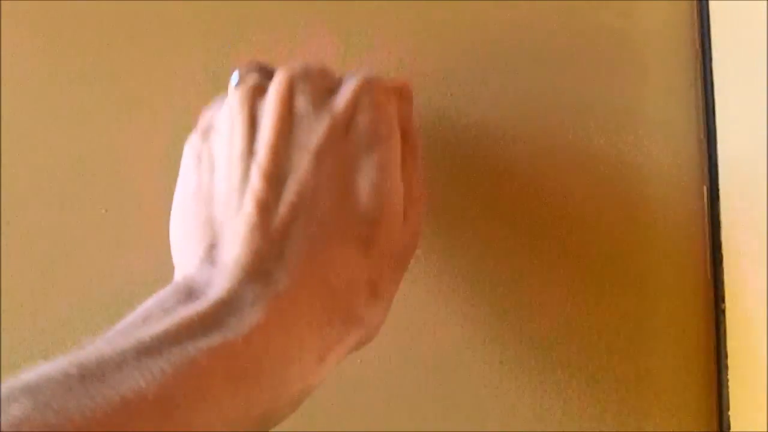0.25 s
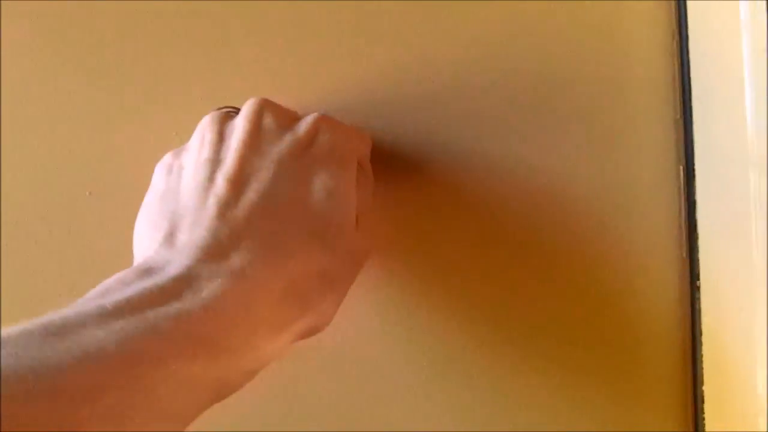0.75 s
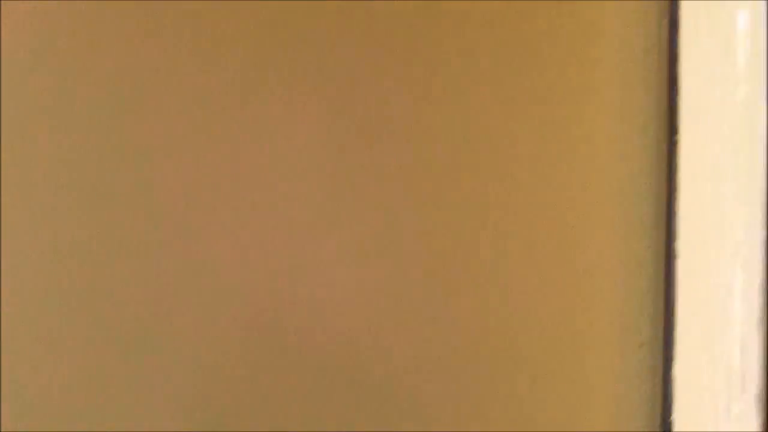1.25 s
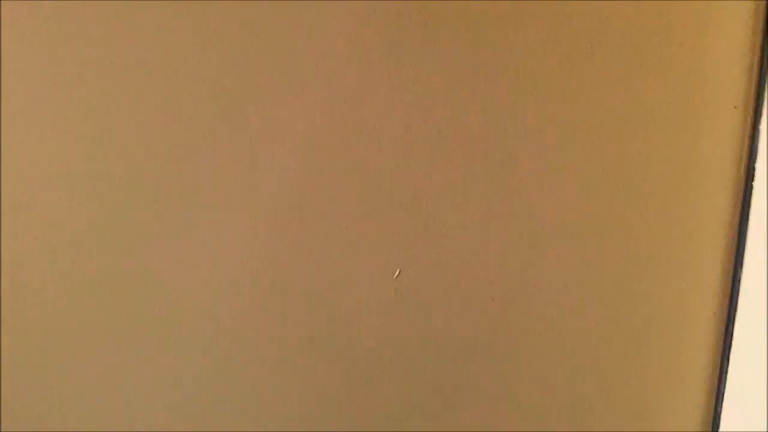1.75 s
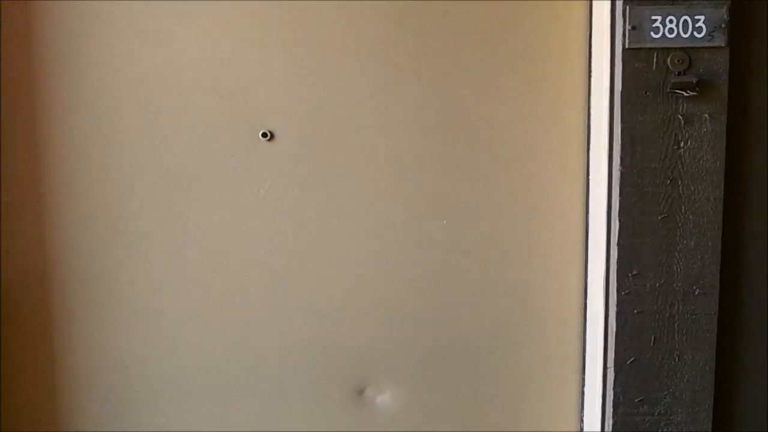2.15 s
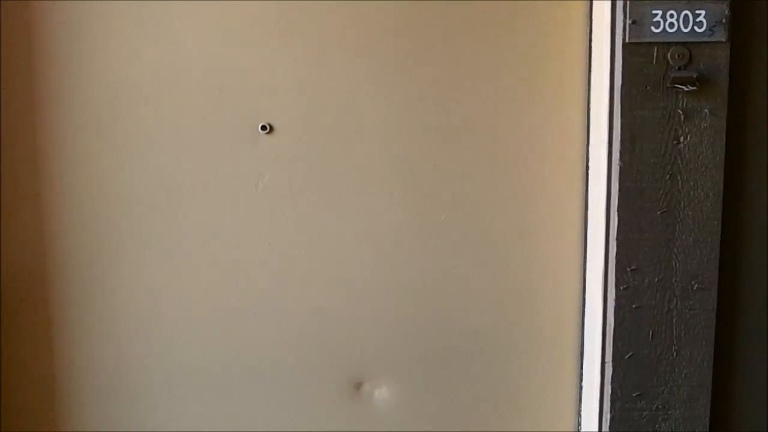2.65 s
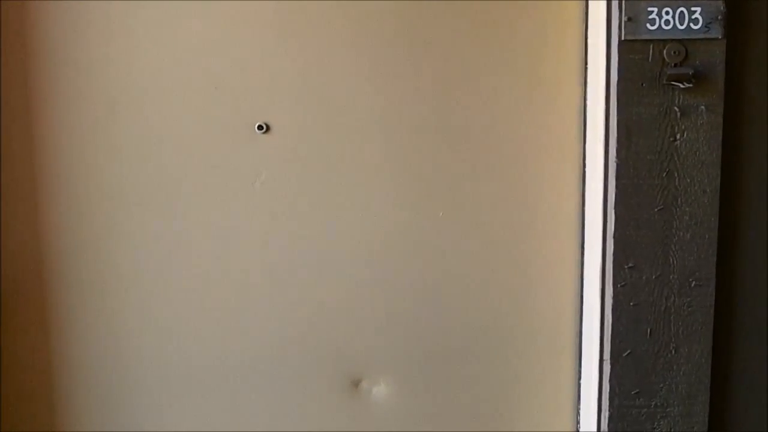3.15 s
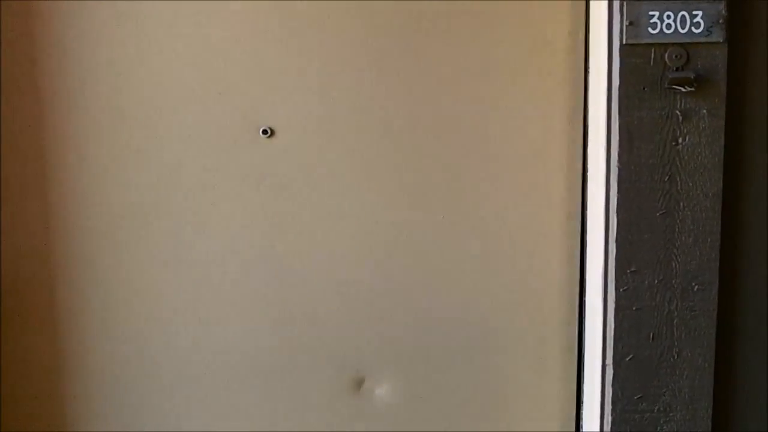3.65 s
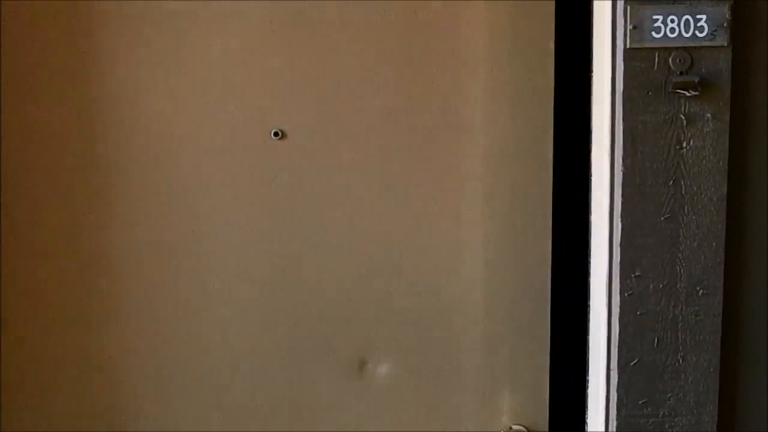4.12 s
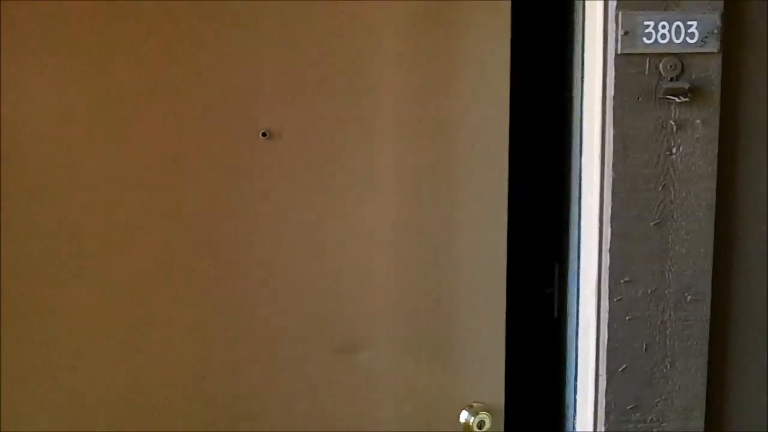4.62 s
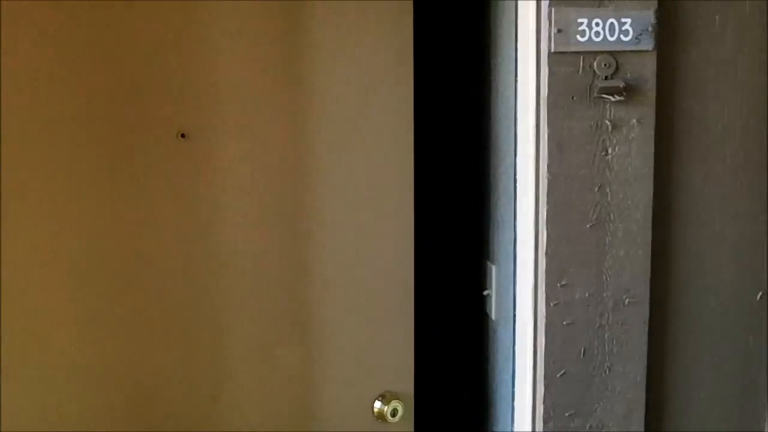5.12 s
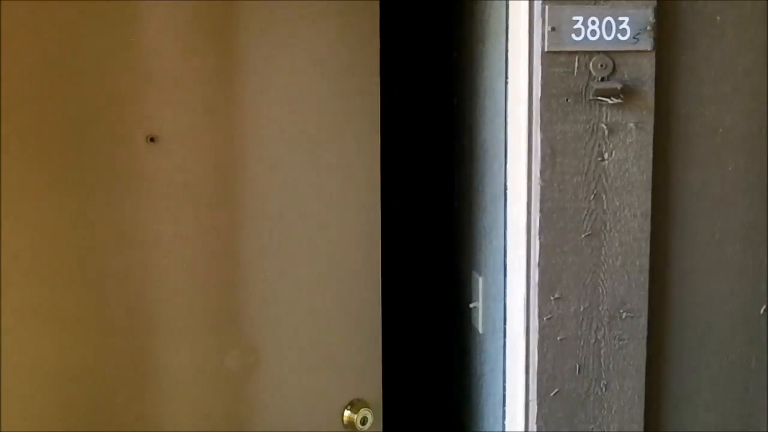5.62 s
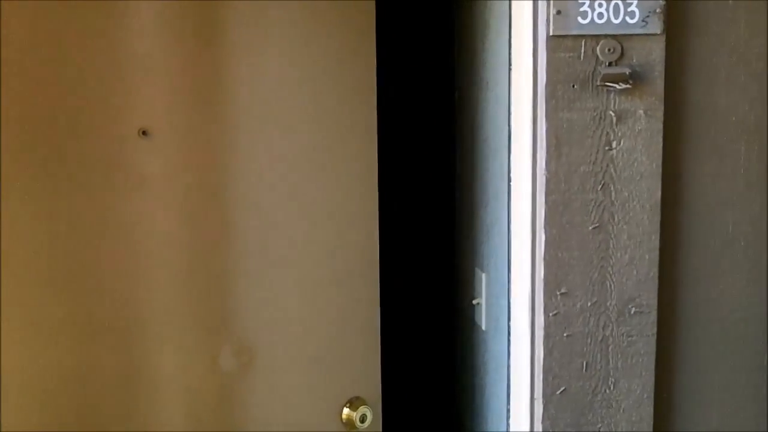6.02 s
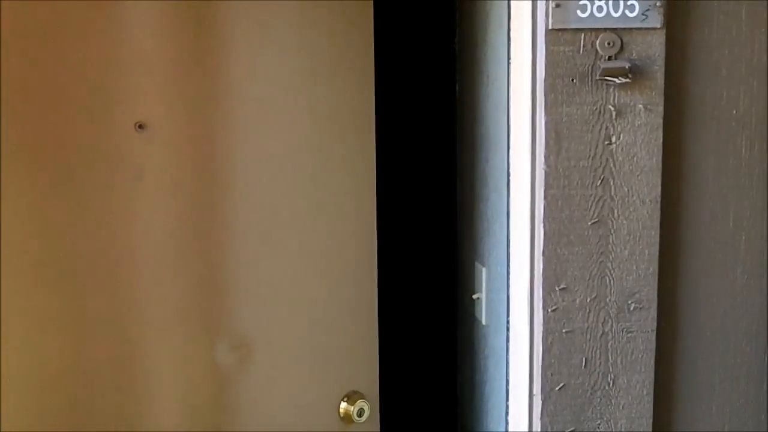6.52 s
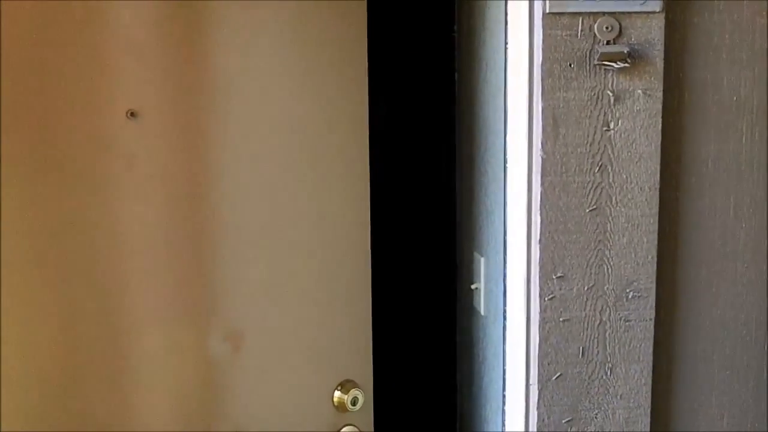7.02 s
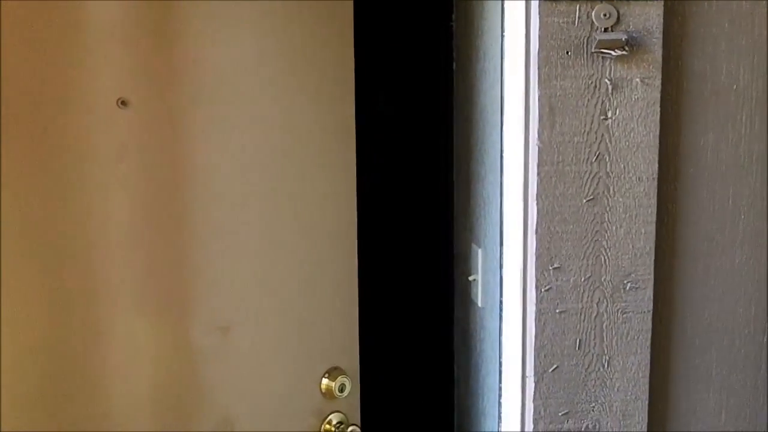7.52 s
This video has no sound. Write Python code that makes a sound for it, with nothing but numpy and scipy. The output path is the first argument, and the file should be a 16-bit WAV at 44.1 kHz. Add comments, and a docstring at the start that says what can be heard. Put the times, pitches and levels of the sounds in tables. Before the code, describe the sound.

Close to a small, slightly dull microphone in a short-echoing hallway: one woody knock with a quick latch rattle, soft cloth and foot shuffles, then a lock click with a brief metal ring. A harsh burst of clacks and rubbing frees the tight door, the loudest moment. It falls quiet, with only slight rustles, before eight rapid light clicks with small thuds. Gentle air noise and faint hum continue throughout.

```python
"""Knock, stiff door and clicks

A knuckle raps once on a flat wooden door in a hallway; someone shuffles, works the lock and pulls the door
out of its tight frame. Eight light hard clicks follow, over room noise and a faint hum. Struck bodies are
sums of damped modes, rubbing is filtered random slips, small contacts are dying noise bursts, and the hall
is convolution with a decaying noise tail. A small microphone notches, clips and low-passes the sum."""
import sys
import numpy as np
from scipy import signal
from scipy.fft import rfft, irfft
from scipy.io import wavfile

SR = 44100
rng = np.random.default_rng(int(sys.argv[2]) if len(sys.argv) > 2 else 0)


def unload_audio(sound):
    """Save the sound as a 16-bit wav file, at the path given as the first command line argument."""
    columns = np.transpose(np.atleast_2d(sound))
    # keep every value between -1 and 1, then stretch to whole-number steps
    steps = np.round(np.clip(columns, -1, 1) * 32767)
    wavfile.write(sys.argv[1], SR, steps.astype(np.int16))


N = 342506

# modes of the door leaf: f/Hz, level/dB, t60/s
DOOR_MODES = [(147.7, -14, 0.54), (183, -21, 0.026), (226, -5, 0.043), (275, -16, 0.049),
              (349, -6.5, 0.045), (450.6, -19.5, 1), (520, -2, 0.017), (620, -26, 0.028),
              (825, -7.5, 0.011), (1257, 7.5, 0.01), (1490, -7, 0.012), (2040, 2.5, 0.013),
              (3030, 2.5, 0.0061), (3320, -14, 0.0048)]


def amp(db):
    """Logarithmic level: decibels to amplitude gain."""
    return 10 ** (np.asarray(db) / 20)


def rms_one(x):
    """Power normalisation: scale to rms 1."""
    return x / np.sqrt(np.mean(x ** 2) + 1e-20)


def band(x, low_hz, high_hz):
    """Band limiting by a Butterworth band-pass."""
    return signal.sosfilt(signal.butter(2, [low_hz, high_hz], "band", fs=SR, output="sos"), x)


def steep(x, hz, kind):
    """Band limiting by a sixth-order Butterworth high- or low-pass."""
    return signal.sosfilt(signal.butter(6, hz, kind, fs=SR, output="sos"), x)


def soften(x, hz, order):
    """A soft contact lengthens the force pulse, which low-passes its spectrum."""
    return signal.lfilter(*signal.butter(order, hz, fs=SR), x)


def at_hz(rows, hz, axis=1):
    """Interpolation of a table column along logarithmic frequency."""
    rows = np.array(rows)
    return np.interp(np.log(np.maximum(hz, 1)), np.log(rows[:, 0]), rows[:, axis])


def ring(impulses, hz, t60):
    """Damped resonator: a unit impulse starts a sine of height 1 that decays 60 dB in t60."""
    radius = amp(-60 / (t60 * SR))
    angle = 2 * np.pi * hz / SR
    feedback = [1, -2 * radius * np.cos(angle), radius ** 2]
    return signal.lfilter([0, np.sin(angle)], feedback, impulses + 1e-18)   # offset avoids denormals


def grains(per_s, spread_db):
    """Stick-slip as a random pulse train: slips of uneven size and either sign, rms 1."""
    sizes = amp(spread_db * np.minimum(rng.exponential(1, N), 5))
    signs = rng.choice([-1, 1], N)
    return rms_one(sizes * signs * (rng.random(N) < per_s / SR))


def strokes(rows, attack_s):
    """Amplitude envelopes: strokes swell, hold and fade; one gain for the main layer and each further one."""
    t, gains = np.arange(N) / SR, 0
    for s, hold, fade, db, *layers_db in rows:
        swell = np.clip(1 + (t - s) / attack_s, 0, 1) ** 2
        shape = swell * amp(db - fade * np.clip(t - s - hold, 0, 2))
        gains = gains + shape * amp([0] + layers_db)[:, None]
    return gains


def knock():
    """Modal excitation: the knuckle's short push rings every mode of the leaf."""
    knock_s, push_db, knuckle_hz = .3918, 1.5, 2220
    push = np.zeros(N)
    push[round(knock_s * SR)] = amp(push_db)
    push = soften(push, knuckle_hz, order=1)
    leaf = sum(amp(db) * ring(push, hz, t60) for hz, db, t60 in DOOR_MODES)
    return steep(leaf, 150, "high")   # a leaf radiates little deep bass


def shudder():
    """Repeated modal excitation: the struck leaf swings against its frame, and equal-sized slaps at random
    moments feed its low modes."""
    # swings: full at t/s, hold/s, fade/(dB/s), level/dB, then relative to it crackle/dB, sway/dB
    swings = [(.404, 0.00083, 402, -24.5, -13, 3), (.42, .1, 115, -23.5, -17.5, -22),
              (.47, 0.012, 350, -32, -31, 7), (.535, 0.021, 147, -29.5, -10.5, -25)]
    level, crackle, sway = strokes(swings, attack_s=.006)
    slaps = grains(per_s=2500, spread_db=0.0)
    low_modes = [row for row in DOOR_MODES if 100 < row[0] < 700]
    longest_t60 = .08   # s, contact with the frame damps the leaf
    wood = sum(amp(db) * ring(slaps, hz, min(t60, longest_t60)) for hz, db, t60 in low_modes)
    return (level * rms_one(steep(wood, 132, "high"))
            + crackle * rms_one(band(slaps, 1400, 2700))
            + sway * rms_one(band(slaps, 21, 87)))


def ticks():
    """Impact noise: each hard contact is a dying burst, partly broad, partly coloured around its own pitch."""
    # contacts of latch and lock: t/s, peak level/dB, pitch f/Hz, broad part relative to coloured/dB, t60/s
    contacts = [(.399, -12, 3000, 0, 0.016), (0.4172, -11.5, 3000, -4, 0.011),
                (0.4192, -13.5, 2930, -2, 0.013), (.4405, -16.5, 2880, 0, 0.0053),
                (.4605, -32, 4800, -6, .008), (1.4325, -20.5, 2070, 6, 0.023), (1.6491, -26, 1510, 0, .02),
                (1.917, -23, 2400, 5, 0.017), (2.286, -16, 1220, -13, 0.011),
                (2.3157, -20.5, 2700, -15, .015), (2.3686, -11, 2640, 7, 0.028),
                (2.396, -5.5, 2570, 1, 0.043), (2.634, -19.5, 4050, 31, 0.03),
                (3.37, -17.5, 2290, 5, 0.061), (3.5113, -19.5, 2700, -1, 0.058),
                (3.579, -3, 2510, 8, 0.0089), (3.603, -14, 2320, -14, 0.019),
                (3.6674, -11.5, 3120, 2, 0.032), (3.6983, -11, 2900, 11, 0.033),
                (3.769, -5, 1290, 1, 0.0073), (3.7926, -7, 2150, -4, 0.021),
                (3.8036, -1.5, 2970, 17, 0.015), (3.813, 1, 2570, 5.5, 0.018),
                (3.8383, -2.5, 2000, 3, 0.028), (3.8516, -3.5, 2050, -5, 0.018),
                (3.8662, -11, 2190, 6, 0.022), (3.8864, -5, 2140, -5, 0.012),
                (3.9095, -8, 2050, -9, 0.0086), (4.898, -22.5, 5300, 4, 0.011),
                (5.5099, -27.5, 1800, -2, 0.022), (5.5894, -28, 3020, -1, 0.03),
                (7.5547, -27.5, 2840, 8, .02)]
    out, t = np.zeros(N), np.arange(3000) / SR
    whites = rng.standard_normal((len(contacts), len(t)))
    for (s, db, hz, wide_db, t60), white in zip(contacts, whites):
        coloured = rms_one(band(white, hz / 1.25, hz * 1.3))
        broad = rms_one(band(white, 940, 12000))
        burst = (coloured + amp(wide_db) * broad) * amp(-60 * t / t60)
        at = round(s * SR)
        out[at:at + len(t)] += amp(db) * burst / np.max(np.abs(burst))
    return out


def bolt():
    """Modal ringing of metal: each snap of the bolt excites its high modes."""
    # snaps: t/s, level/dB
    snaps = [(2.396, -23), (2.633, -40)]
    # modes of the bolt: f/Hz, level/dB, t60/s
    bolt_modes = [(3600, -5, 0.056), (4250, -13, 0.15), (4420, -3.5, 0.15), (4530, -10, 0.2)]
    hits = np.zeros(N)
    for s, db in snaps:
        hits[round(s * SR)] = amp(db)
    return sum(amp(db) * ring(hits, hz, t60) for hz, db, t60 in bolt_modes)


def rubbing():
    """Stick-slip friction: grains excite the hardware's mid ring, the wood below and a bright scrape above."""
    # rubs of lock parts and leaf: full at t/s, hold/s, fade/(dB/s), level/dB,
    # then relative to it rumble/dB, dull part/dB, bright part/dB
    rubs = [(2.276, 0.026, 300, -37, -10, 1.5, -18), (2.37, .001, 900, -30, -12, -6, -9),
            (2.398, .001, 180, -27, -10, 1, -22), (3.37, .001, 298, -30, -11, -5, -9),
            (3.4, 0.0066, 153, -40.5, -5.5, 8.5, -15), (3.512, .001, 350, -36.5, -2, -3, -10),
            (3.56, 0.011, 500, -34.5, -10, -2, 0), (3.6, .001, 53, -27, -9.5, -3, 2.5),
            (3.82, 0.05, 400, -24.5, -10, -4, 2.5), (3.85, 0.12, 125, -25.5, -14, -13, -30),
            (4.03, 0.0084, 159, -63, -16, -28, -35)]
    mid, rumble, dull, bright = strokes(rubs, attack_s=0.021)
    slips = grains(per_s=3500, spread_db=1.0)
    hardware = band(slips, 1850, 2980) + 0.85 * band(band(slips, 1470, 2550), 1470, 2550)
    wood = band(slips, 170, 507) + 1.2 * band(slips, 45, 91)
    return (mid * rms_one(hardware) + rumble * rms_one(wood)
            + dull * rms_one(band(slips, 420, 1510))
            + bright * rms_one(band(slips, 6400, 16000)))


def clicker():
    """Shared resonances: one small body struck each time gives all clicks one colour, with a soft thud below."""
    # the run of light clicks: t/s, strike level/dB
    strikes = np.array([(5.9897, -14), (6.094, -18), (6.2159, -11.5), (6.3352, -16), (6.4317, -12),
                        (6.563, -12.5), (6.7113, -12.5), (6.8351, -18)])
    # modes of the clicking body: f/Hz, level/dB, t60/s
    body_modes = [(1602, -9.5, 0.037), (1840, -20, 0.17), (1870, -13.5, 0.087), (1982, -7.5, 0.027),
                  (2320, -11.5, 0.017), (2560, -21, 0.026), (3100, -20, 0.017), (2840, 7, 0.0059),
                  (3340, 4.5, 0.0054), (4540, -0.5, 0.0045), (5700, 0, 0.0026)]
    at = np.round(strikes[:, 0] * SR).astype(int)
    strike_db = strikes[:, 1]
    body, thud = np.zeros(N), np.zeros(N)
    for hz, db, t60 in body_modes:
        hits = np.zeros(N)
        hits[at] = amp(strike_db + db + 2.1 * rng.standard_normal(len(strikes)))   # each mode varies by 2.1 dB
        body += ring(hits, hz, t60)
    body = soften(body, 3800, order=2)   # the contact is slightly soft
    body = steep(steep(body, 1793, "high"), 9400, "low")
    thud[at] = amp(strike_db + 14.0)
    return body + band(band(thud, 120, 770), 120, 770)


def squeaks():
    """Narrow resonance: fast slips are heard through one band each, starting quickly and fading out."""
    # squeaks, rings and hisses: t/s, length/s, centre f/Hz, width/Hz, level before the envelope/dB
    notes = [(0.891, 0.05, 1860, 150, -39), (0.908, 0.071, 2570, 400, -38), (1.029, 0.23, 2100, 350, -42),
             (1.26, 0.089, 2290, 900, -41.5), (1.929, 0.54, 2180, 350, -46), (0.01, 0.28, 2100, 400, -42),
             (1.535, 0.15, 7100, 1200, -39.5), (1.862, 0.068, 1260, 80, -40), (1.91, 0.11, 7040, 500, -42),
             (4.278, 0.037, 1190, 119, -38), (4.895, 0.097, 5300, 500, -42), (4.89, 0.12, 3450, 600, -44.5),
             (6.097, 0.24, 6840, 1200, -38.5)]
    out, count = np.zeros(N), SR // 4   # none sounds past a quarter second
    for (s, length, hz, width, db), slips in zip(notes, rng.standard_normal((len(notes), count))):
        age = np.arange(count) / SR / length
        at = round(s * SR)
        tone = rms_one(band(slips, hz - width / 2, hz + width / 2))
        out[at:at + count] += amp(db) * tone * np.clip(np.minimum(age * 30, 1 - age), 0, 1)
    return out


def shuffle():
    """Friction of cloth and feet: soft grains around two kilohertz over a floorboard's low murmur."""
    # moves: full at t/s, hold/s, fade/(dB/s), level/dB, floorboard part relative to it/dB
    moves = [(0.0, 0.15, 300, -47, -9), (.92, .01, 89, -39.5, -17), (1.05, 0.42, 40, -48.5, -1.5),
             (1.438, .001, 800, -39, -22), (1.65, 0.015, 100, -49, -1.5), (1.792, .005, 1100, -32, -23),
             (1.834, .001, 800, -31.5, -21), (1.872, 0.00089, 752, -28, -18), (1.96, 0.45, 200, -49.5, -12),
             (2.96, .001, 250, -41, -10), (4.29, .001, 600, -50, 1), (4.5, .02, 56, -49.5, -1.5),
             (4.894, .06, 252, -49.5, -16), (5.6, .02, 200, -41.5, -27), (5.648, .001, 82, -39, -23)]
    cloth, board = strokes(moves, attack_s=0.014)
    slips = grains(per_s=4000, spread_db=1.5)
    return cloth * rms_one(band(slips, 1700, 3020)) + board * rms_one(band(slips, 296, 430))


def hall(x):
    """Diffuse reverberation: half-octave bands of noise, each dying at its own rate after a short gap."""
    # reverberation: f/Hz, relative level/dB, t60/s
    decay = [(60, 3.5, 0.17), (252, 6, 0.4), (670, 3.5, 0.53), (1310, -2.5, 0.3), (1960, 4, 0.39),
             (2960, 0, 0.17), (3960, 2, 0.25), (8600, 17.5, 0.026)]
    t, edges = np.arange(SR) / SR, 40 * 2 ** np.arange(0, 8.6, .5)
    whites, tail = rng.standard_normal((2, SR)), 0
    for k, (low, high) in enumerate(zip(edges, edges[1:])):
        hz = np.sqrt(low * high)
        fall_db = 60 * t / at_hz(decay, hz, axis=2)
        tail = tail + band(whites[k % 2], low, high) * amp(at_hz(decay, hz) - fall_db)
    tail = tail * np.clip((t - .002) / 0.00047, 0, 1)   # 2 ms gap, then a 0.47 ms rise
    return signal.fftconvolve(x, tail / np.sqrt(np.sum(tail ** 2)))[:N]


def air():
    """Spectral shaping of white noise: steady ventilation and microphone noise."""
    # room noise: f/Hz, relative density/(dB per Hz)
    spectrum_db = [(12, -12), (20, -4), (133, -10.5), (166, -8), (191, -10.5), (324, -14), (393, -13.5),
                   (614, -9.5), (705, -10), (932, -10.5), (4810, -20.5), (6020, -25), (7730, -30),
                   (9390, -29), (15500, -28.5)]
    hz = np.arange(N // 2 + 1) * SR / N
    shaped = rfft(rng.standard_normal(N)) * amp(at_hz(spectrum_db, hz))
    return amp(-42.5) * rms_one(irfft(shaped, N))


def hum():
    """Narrow-band noise: a band a few hertz wide gives a fan's wavering hum."""
    centre_hz, width_hz, level_db = 165.2, 5, -58.5
    noise = rng.standard_normal(N)
    return amp(level_db) * rms_one(band(noise, centre_hz - width_hz / 2, centre_hz + width_hz / 2))


def scene():
    """Superposition: direct sources plus hallway sound with a share for each group; the top octave is weak."""
    door, parts, clicks = knock(), ticks() + bolt() + rubbing(), clicker()
    to_hall = amp(-14.5) * band(door, 144, 1530) + amp(-8.0) * parts
    to_hall = to_hall + amp(1.5) * soften(clicks, 2600, order=1)
    near = door + shudder() + parts + clicks + hall(to_hall) + shuffle() + squeaks()
    top = steep(steep(near, 8970, "high"), 10160, "low")
    near = steep(near, 6290, "low") + amp(-14.5) * top
    return (near + air() + hum())[None]


def record(dry):
    """Transducer response: the microphone port has a notch, peaks clip, the top is cut."""
    notch = signal.sosfilt(signal.butter(2, [7200, 8700], "bandstop", fs=SR, output="sos"), dry)
    loud = np.clip(notch, -1, 1)
    top_cut = signal.cheby2(16, 70, 15700, fs=SR, output="sos")   # 70 dB down from 15.7 kHz
    return np.clip(signal.sosfilt(top_cut, loud), -1, 1)


dry = scene()
out = record(dry)
unload_audio(out)
```